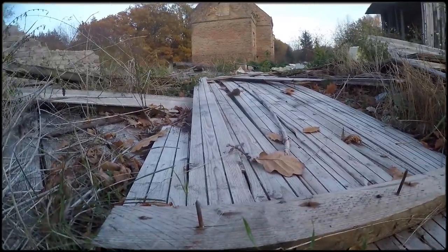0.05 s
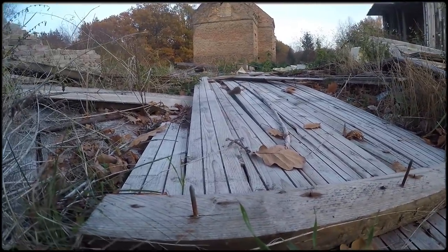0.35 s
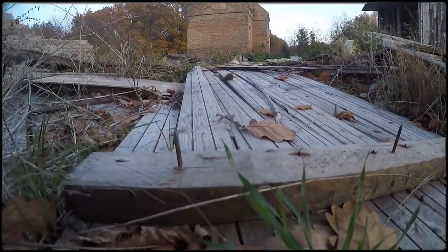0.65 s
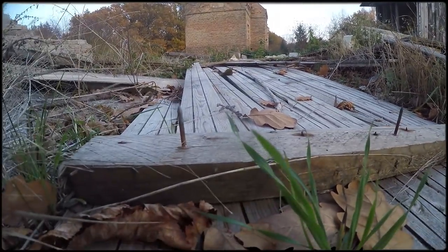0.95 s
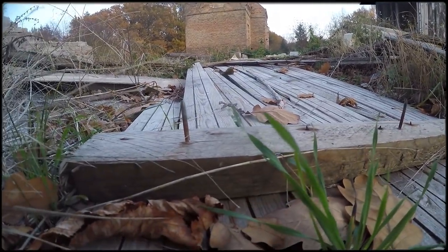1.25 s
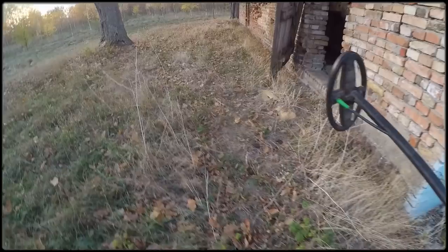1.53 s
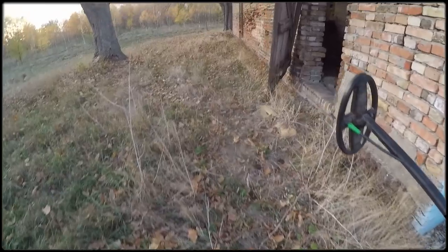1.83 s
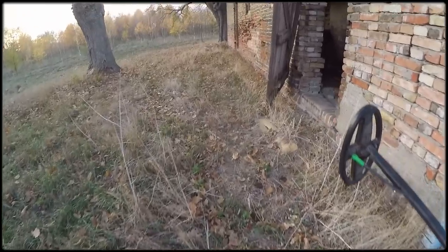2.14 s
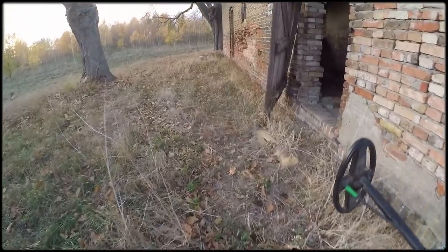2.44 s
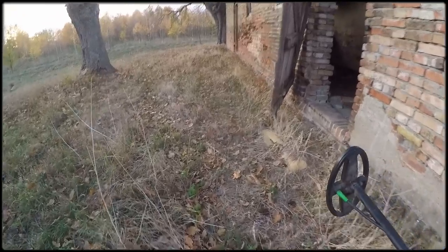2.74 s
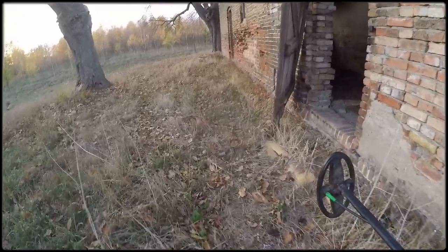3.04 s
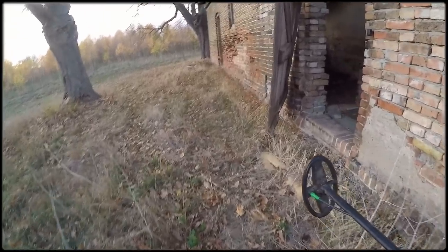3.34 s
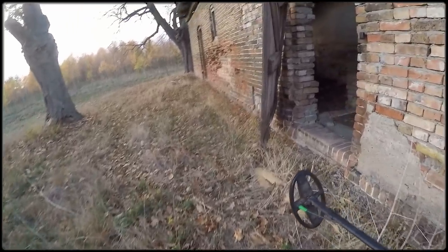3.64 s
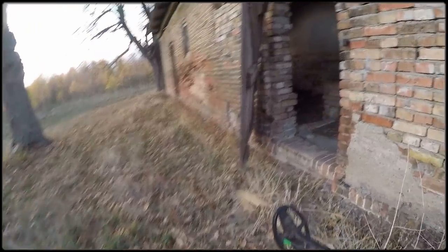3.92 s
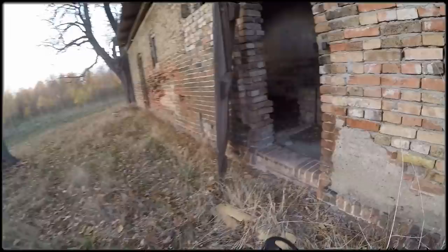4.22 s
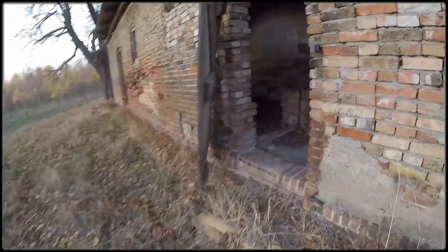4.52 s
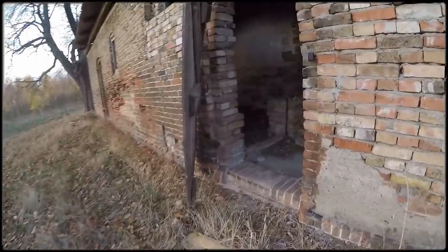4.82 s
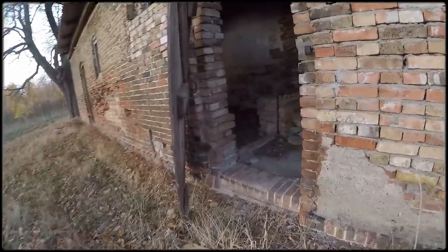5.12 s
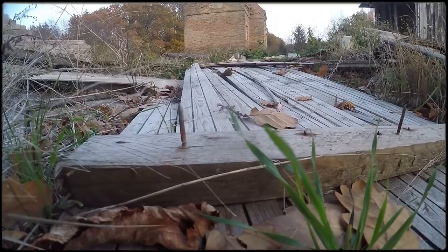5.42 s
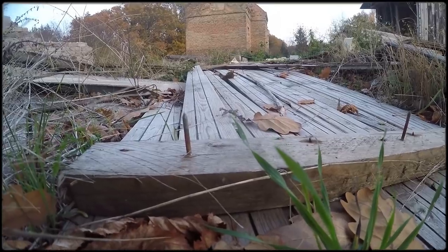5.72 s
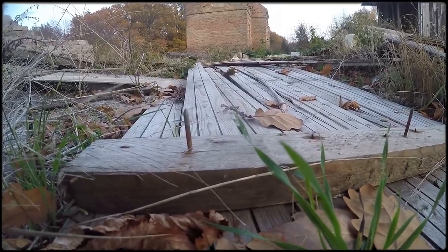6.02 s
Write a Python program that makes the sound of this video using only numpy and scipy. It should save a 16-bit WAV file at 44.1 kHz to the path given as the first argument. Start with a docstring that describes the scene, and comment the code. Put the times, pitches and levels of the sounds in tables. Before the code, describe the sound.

Loud, hollow steps on loose planks give way to rustling leaves and cracking twigs, with quiet brushing grass before and after.

```python
"""An overgrown yard with old planks. First, grass stalks brush and flick a camera's case near the ground.
At about 1.6 s a louder, duller walk takes over: heavy steps thud on hollow boards, then feet shuffle
and a loose board sways. From about 3.4 s legs sweep through dry leaves while twigs snap underfoot.
At about 5.4 s the quiet grass returns. A light wind rumbles from start to end."""
import sys
import numpy as np
from scipy import signal
from scipy.fft import rfft, irfft
from scipy.io import wavfile
from scipy.ndimage import uniform_filter1d

SR = 44100
rng = np.random.default_rng(int(sys.argv[2]) if len(sys.argv) > 2 else 0)


def store_wav(level_fs):
    """Save 16-bit WAV to argv[1]."""
    pcm = np.round(np.clip(np.atleast_2d(level_fs), -1, 1) * 32767)
    wavfile.write(sys.argv[1], SR, pcm.T.astype(np.int16))


N = 267422

# Levels in dB are relative: each function may add a gain. A decay_s is the time to fade by 60 dB.
# footfalls: start_s, board_name, ring_db, rattle_db, rattle_decay_s, crush_db, crush_decay_s
FOOTFALLS = [(1.587, "short", -26.5, -29.5, 0.18, -38.5, 0.15),
             (1.607, "short", -30.5, -26.5, 0.051, -33.5, 0.1),
             (1.7775, "short", -11, -12, 0.08, -24.5, 0.19), (1.815, "short", -18.5, -28, 0.14, -49, .06),
             (2.126, "loose", -47, -40, 0.32, -36.5, 0.23), (2.145, "short", -11, -25, 0.14, -39, .1),
             (2.159, "loose", -2, -6.5, 0.21, -11.5, 0.12), (2.192, "loose", -38, -16, 0.31, -30, 0.66),
             (2.224, "loose", -45, -22.5, 0.15, -16, 0.021), (2.246, "short", -45, -36, 0.25, -44, 0.08),
             (3.9975, "long", -8.5, -22.5, 0.6, -23, 0.19)]
# the tones of each of three boards, by name: pitch_hz, level_db, decay_s
BOARD_TONES = {"short": [(62, -39, 0.13), (125, -19, 0.0983), (181.6, -1, 0.11), (249, -5, 0.088),
               (378, -16.5, 0.075), (486, -5, 0.023), (669, -23, 0.3)], "loose": [(48.3, -33, 0.96),
               (80, -12.5, 0.54), (125.6, -29, 0.2), (331, -1, 0.054), (482, -3, 0.077), (660, -43, 0.1233),
               (841, 3.5, 0.0345), (1073, 14, 0.0068)], "long": [(45, -12, 0.17), (69, -0.5, 0.26),
               (266, -10, 0.19), (360, 7, 0.066), (406.3, -0.5, 0.23), (467, -8, 0.25), (820, -36, .07)]}
# knocks of shifting feet and rocking boards: start_s, level_db, pitch_hz
FOOT_KNOCKS = [(1.707, -31.5, 270), (1.783, -18, 206), (2.129, -15.5, 53.3), (2.168, -8, 61),
               (2.226, -11, 113), (2.246, -14.5, 59), (2.529, -29, 292), (2.546, -30.5, 85.5),
               (2.614, -24, 153), (2.673, -31, 127), (2.749, -24.5, 249), (2.817, -27, 390),
               (2.897, -34, 193), (2.943, -27.5, 143), (3.016, -31, 243), (3.064, -26.5, 204),
               (3.092, -22.5, 241), (3.162, -33.5, 445), (3.371, -27.5, 175), (3.851, -26.5, 220),
               (4.102, -23, 105), (4.154, -23, 78.5), (4.25, -26.5, 401), (5.384, -29, 77)]
# things that break: start_s, level_db, pitch_hz, decay_s, stem_db
TWIG_CRACKS = [(1.771, -31, 2200, .012, -5), (1.7745, -15.5, 2400, 0.027, -4),
               (1.817, -23.5, 1460, 0.099, -22), (2.159, -9, 3620, 0.023, -10.5),
               (2.8187, -33, 1460, 0.029, 2.5), (2.946, -33.5, 2390, 0.033, -19),
               (3.0255, -38, 1950, .025, -7), (3.044, -33, 1880, 0.005, 7), (3.3707, -29, 4500, 0.11, -28),
               (3.4974, -23.5, 2700, 0.0066, -1), (3.853, -21, 2980, 0.02, -1),
               (3.979, -16.5, 974, 0.083, -13.5), (3.989, -8.5, 3800, 0.0087, -16),
               (4.0732, -11.5, 3000, .028, -6), (4.088, -17.5, 3720, 0.13, -18.5),
               (4.2886, -24.5, 1240, 0.034, -12), (4.671, -12, 3880, 0.006, -3),
               (4.684, -28, 1480, 0.053, -15), (5.16, -22.5, 3220, 0.006, -17),
               (5.2485, -25.5, 3980, 0.037, -5.5), (5.3714, -17, 3320, 0.013, -31),
               (5.382, -14, 3720, 0.028, -31)]  # twigs and splinters underfoot
BLADE_SNAPS = [(.1495, -33, 6800, 0.028, -3), (.224, -26.5, 5860, 0.0036, -3),
               (.2995, -36.5, 7900, 0.024, -23), (.713, -41, 9900, 0.019, -12),
               (.9416, -25.5, 8200, 0.0066, -30), (1.0055, -41, 4800, 0.0049, 4),
               (1.083, -49, 4057, 0.042, -20), (1.273, -51, 1390, 0.05, -1), (1.532, -49.5, 1250, 0.055, 0),
               (5.888, -48, 6950, .008, .5)]  # dry grass blades nearby
# stalks flicking the case: start_s, catch_count, level_db, tick_db
STALK_FLICKS = [(.0036, 1, -29, 8), (0.0218, 1, -24, -2), (0.0343, 5, -26.5, -3), (0.0848, 1, -25.5, -2),
                (.102, 1, -27.5, -10), (0.1258, 1, -23.5, 7), (.1921, 2, -22.5, -4), (0.225, 1, -22.5, -7),
                (.249, 1, -24, 6), (.278, 1, -24, -15), (.303, 1, -23.5, -7), (.331, 1, -21, 5.5),
                (.354, 1, -22.5, 7.5), (0.3883, 1, -21, 8.5), (0.4373, 1, -24, 6), (.5162, 1, -21.5, 5.5),
                (.544, 1, -23, -10), (0.6037, 1, -24.5, 7.5), (0.7256, 1, -26.5, 10), (0.9657, 1, -26.5, 0)]
# the tones of the case: pitch_hz, level_db, decay_s
TOCK_TONES = [(113.3, -12, 0.034), (200, -4, 0.025), (1028, 11.5, 0.0078)]  # its hollow tock
TICK_TONES = [(2860, 1.5, 0.0028), (5600, -3, 0.0034), (7750, 0, 0.0027)]  # its high tick

# movements that swell and fade: peak_s, level_db, rise_s, hold_s, fall_s
LEG_SWEEPS = [(3.39, -34.5, 0.022, 0.01, 0.26), (3.66, -26, 0.31, 0.33, 0.43), (4.4, -45, 0.42, 0.06, 0.24),
              (4.67, -39, 0.045, 0.018, 0.072), (4.75, -45.5, 0.35, 0.35, 0.35),
              (5.12, -31.5, 0.21, .1, 0.31), (5.39, -29, 0.088, 0.041, 0.11)]  # legs sweeping dry leaves
SOLE_SCUFFS = [(1.86, -40, .1, 0.02, .2), (3.1, -31.5, 0.077, 0.012, 0.064), (4.3, -42, 0.6, 0.1, .3)]  # soles scuffing the boards
BOARD_SWAYS = [(2.57, 1.5, 0.044, 0.12, 0.45), (2.92, -2.5, 0.16, 0.55, .3)]  # the loose board swaying
GRASS_STIRS = [(0, -51, .1, 0.73, 0.51), (.55, -51.5, 0.28, 0.057, 0.057), (1.2, -57, .25, 0.044, 0.79),
               (5.44, -57, 0.28, 0.012, 1.35)]  # grass stirred by the camera, then settling

# colours, or how strong a noise is from low to high: frequency_hz, level_db
RATTLE_COLOUR = [(30, 1.5), (90, 11), (200, 5.5), (330, -7.5), (500, 1), (620, -4.5), (820, -2),
                 (1150, -22), (2000, -46.5), (5000, -53.5)]  # loose boards rattling after a step
CRUSH_COLOUR = [(300, -17.5), (1200, 0.5), (1750, -6.5), (2150, -2.5), (2450, 4), (3400, -0.5),
                (4300, -7.5), (5200, -16), (6200, -25)]  # leaves crushed by a step
LEAF_COLOUR = [(88, -32), (150, -1), (254, -15.5), (456, -2), (508, -7), (611, -3.5), (807, -6),
               (956, -5.5), (3340, -1.5), (4210, -4.5), (6000, -14), (7800, -50), (13200, -120)]  # swept leaves
HOLLOW_COLOUR = [(50, -24), (110, -4), (220, -0.5), (400, -6.5), (800, -10.5), (1500, -18.5), (4000, -46)]  # hollow boards
SWAYING_COLOUR = [(15, -12.5), (32, 2), (70, 0), (130, -1.5), (220, -12.5), (600, -58)]  # the swaying board
GRASS_COLOUR = [(180, -8), (300, 0), (620, -6.5), (1640, -9), (2520, -11.5), (3690, -11.5), (4720, -12.5),
                (8140, -12.5), (8700, -12.5), (14800, -25.5), (15500, -38.5)]  # brushing grass
WIND_COLOUR = [(12, 2), (30, 9), (60, -0.5), (120, -5), (200, -15), (400, -33), (1000, -47.5), (3000, -82)]  # wind
AIR_COLOUR = [(150, -56), (250, -4), (366, -21), (717, -12.5), (867, -18), (1510, -16), (3280, -44),
              (4960, -24), (15500, -25.5)]  # still air

WALK_START_S, WALK_END_S = 1.587, 5.424
WALK_CUTOFF_HZ, SPILL_CUTOFF_HZ, TOP_CUTOFF_HZ = 6200, 9600, 15700


def footsteps(heel_s=0.00055):
    """The heel makes a board ring, the pile rattles, and leaves are crushed under the sole."""
    t, out = np.arange(SR * 3 // 4) / SR, np.zeros(N)
    contact = 1 - np.exp(-t / heel_s)
    for start_s, board, ring_db, rattle_db, rattle_decay_s, crush_db, crush_decay_s in FOOTFALLS:
        thud = amp(ring_db) * ring(BOARD_TONES[board], t)
        rattle = amp(rattle_db) * noise(RATTLE_COLOUR, len(t)) * fade(t, rattle_decay_s)
        crush = amp(crush_db) * noise(CRUSH_COLOUR, len(t)) * fade(t, crush_decay_s)
        add(out, start_s, (thud + rattle + crush) * contact)
    return out


def leaves(sweeping, bands=7):
    """Dry leaves slide over legs: a crackly swish whose colour shifts from tuft to tuft."""
    ticks = crackle(per_s=1400, spread_db=-1.5, decay_s=0.0027, low_hz=690, high_hz=5700)
    spectrum = rfft(colour(rng.standard_normal(N) + amp(-6) * ticks, LEAF_COLOUR))
    hz, centres_hz = np.fft.rfftfreq(N, 1 / SR), np.geomspace(400, 5500, bands)
    swish = np.zeros(N)
    for share in np.eye(bands):  # each frequency band wavers on its own
        band = irfft(spectrum * np.interp(hz, centres_hz, share), N)
        swish += band * flutter(per_s=19, depth_db=1.85)
    return amp(0) * sweeping * unit(swish)


def breaks(rows, click_db, click_decay_s, splinter_db):
    """A twig or blade breaks: a sharp click, a spray of splinters, and the lower ring of the stem."""
    t, out = np.arange(SR // 12) / SR, np.zeros(N)
    for start_s, level_db, hz, decay_s, stem_db in rows:
        click = ring([(hz, click_db, click_decay_s)], t)
        band = signal.butter(1, [hz / 1.6, min(hz * 1.5, SR / 2 - 1)], "bandpass", fs=SR)
        hiss = unit(signal.lfilter(*band, rng.standard_normal(len(t))))
        splinters = amp(splinter_db) * hiss * fade(t, decay_s)
        stem = ring([(hz / 6, stem_db, decay_s), (hz / 2.9, stem_db + 2, decay_s)], t)
        add(out, start_s, amp(level_db) * (click + splinters + stem))
    return out


def small_breaks(movement, offset_db, spread_db, middle_hz, decay_s, stem_db, count):
    """Lists small breaks at random moments, louder where the movement is stronger."""
    rows = []
    for when, size, pitch in rng.random((count, 3)):
        level_db = 20 * np.log10(movement[int(when * N)] + 1e-9) + offset_db + spread_db * (size - .5)
        rows.append((when * N / SR, level_db, middle_hz * 2 ** (pitch - .5), decay_s, stem_db))
    return rows


def shuffle(rest_db=-44, stride_db=-10.5, sole_s=0.0016):
    """Weight shifts on the boards: soft knocks and a hollow rumble that grows with each stride."""
    t = np.arange(SR // 2) / SR
    strides = amp(stride_db) * swells(LEG_SWEEPS)
    weight = np.sqrt(amp(rest_db) ** 2 + swells(SOLE_SCUFFS) ** 2 + strides ** 2)
    out = amp(-3) * weight * noise(HOLLOW_COLOUR) * flutter(per_s=14, depth_db=5)
    contact = 1 - np.exp(-t / sole_s)
    for start_s, level_db, hz in FOOT_KNOCKS:
        decay_s = 0.088 * (200 / hz) ** 0.39  # higher knocks die sooner
        knock = ring([(hz, 0, decay_s), (hz * 1.485, -7, decay_s), (hz * 2.78, -11, decay_s / 2)], t)
        add(out, start_s, amp(level_db) * knock * contact)
    return out


def swaying_board():
    """The loose board sways with a deep rumble while weight shifts on it."""
    return amp(-37) * swells(BOARD_SWAYS) * noise(SWAYING_COLOUR) * flutter(per_s=14, depth_db=-1)


def overload(x, ceiling=.92, spill=.33):
    """The heaviest step overloads the microphone: its peaks flatten and spill some harsh treble."""
    flattened = np.clip(x, -ceiling, ceiling)
    return (1 - spill) * low_pass(flattened, WALK_CUTOFF_HZ) + spill * low_pass(flattened, SPILL_CUTOFF_HZ)


def stalk_flicks(push_s=0.00074, slip_s=.0088, detune=.027):
    """Each stalk pushes the case for a moment: a hollow tock, with a tick if the stalk is hard."""
    t, out = np.arange(SR // 20) / SR, np.zeros(N)
    contact = 1 - np.exp(-(t / push_s) ** 2)
    for start_s, catch_count, level_db, tick_db in STALK_FLICKS:
        for catch in range(catch_count):  # a dragged stalk slips and catches again
            detuned_t = t * (1 + detune * rng.standard_normal())
            flick = ring(TOCK_TONES, detuned_t) + amp(tick_db) * ring(TICK_TONES, detuned_t)
            add(out, start_s + catch * slip_s, amp(level_db) * contact * flick)
    # around 500 Hz, between its low and middle tones, the case hardly moves
    return signal.lfilter(*signal.iirnotch(500, Q=1.9, fs=SR), out)


def grass(brushing):
    """Blades brush close by: a fine hiss full of tiny ticks."""
    ticks = crackle(per_s=3300, spread_db=9.5, decay_s=0.0014, low_hz=1500, high_hz=14640)
    rustle = colour(rng.standard_normal(N) + amp(-3) * ticks, GRASS_COLOUR)
    return amp(4.5) * brushing * rustle * flutter(per_s=31, depth_db=.8)


def wind():
    """Wind on the microphone makes a lumpy, low rumble."""
    return amp(-43.5) * noise(WIND_COLOUR) * flutter(per_s=5.6, depth_db=2.7)


def still_air():
    """A faint, steady hush behind the grass."""
    return amp(-61) * noise(AIR_COLOUR)


def crackle(per_s, spread_db, decay_s, low_hz, high_hz, pitches=16):
    """Many tiny breaks of unequal size, each ringing briefly at its blade's pitch."""
    t, out = np.arange(SR // 100) / SR, np.zeros(N)
    for hz in np.geomspace(low_hz, high_hz, pitches):
        sizes = amp(spread_db * np.minimum(rng.exponential(1, N), 4))
        clicks = sizes * rng.choice([-1, 1], N) * (rng.random(N) < per_s / pitches / SR)
        out += np.sqrt(hz) * signal.oaconvolve(clicks, ring([(hz, 0, decay_s)], t))[:N]
    return unit(out)


def swells(rows):
    """Loudness over time: each movement grows 20 dB per rise_s, holds, then drops 20 dB per fall_s."""
    t, power = np.arange(N) / SR, np.zeros(N)
    for peak_s, level_db, rise_s, hold_s, fall_s in rows:
        before = np.maximum(peak_s - t, 0) / rise_s
        after = np.maximum(t - peak_s - hold_s, 0) / fall_s
        power += amp(level_db - 20 * (before + after)) ** 2
    return np.sqrt(power)


def flutter(per_s, depth_db):
    """A random gain that wanders up to about per_s times a second."""
    hz = np.fft.rfftfreq(N, 1 / SR)
    slow_noise = irfft(rfft(rng.standard_normal(N)) * np.exp(-(hz / per_s) ** 2), N)
    return amp(depth_db * unit(slow_noise))


def ring(tones, t):
    """A struck object rings as a sum of fading tones."""
    return sum(amp(db) * fade(t, decay_s) * np.sin(2 * np.pi * hz * t) for hz, db, decay_s in tones)


def fade(t, decay_s):
    """Dies away by 60 dB in decay_s seconds."""
    return np.exp(-np.log(1000) * t / decay_s)


def noise(points, length=N):
    """Random noise with the given colour."""
    return colour(rng.standard_normal(length), points)


def colour(x, points):
    """Shapes the lows and highs of x with a colour table, at an average level of 1."""
    points_hz, points_db = np.transpose(points)
    hz = np.fft.rfftfreq(len(x), 1 / SR)
    gain = amp(np.interp(np.log(hz + 1), np.log(points_hz), points_db))
    return unit(irfft(rfft(x) * gain, len(x)))


def low_pass(x, hz):
    """Cuts away the sound above hz."""
    return signal.oaconvolve(x, signal.firwin(511, hz, window=("kaiser", 9), fs=SR), "same")


def amp(db):
    """Turns decibels into a gain to multiply by."""
    return 10 ** (np.asarray(db) / 20)


def unit(x):
    """Scales x to an average (rms) level of 1."""
    return x / np.sqrt(np.mean(x ** 2) + 1e-20)


def add(mix, start_s, sound):
    """Mixes a sound in at start_s."""
    part = mix[max(round(start_s * SR), 0):][:len(sound)]
    part += sound[:len(part)]


def scene():
    """The dull, loud walk takes the place of the bright, quiet grass for a while."""
    t = np.arange(N) / SR
    walking = uniform_filter1d(((t > WALK_START_S) & (t < WALK_END_S)) * 1., size=44)  # 1 ms crossfades
    brushing = swells(GRASS_STIRS)
    sweeping = np.hypot(swells(LEG_SWEEPS), amp(-52))  # leaves still stir around the feet between sweeps
    small_snaps = small_breaks(brushing, offset_db=4, spread_db=10, middle_hz=5560,
                               decay_s=.012, stem_db=-15, count=50)
    small_cracks = small_breaks(sweeping, offset_db=-9, spread_db=4, middle_hz=3080,
                                decay_s=.01, stem_db=3, count=40)
    near = grass(brushing) + still_air() + stalk_flicks()
    near += breaks(BLADE_SNAPS + small_snaps, click_db=3, click_decay_s=0.0068, splinter_db=5)
    twigs = breaks(TWIG_CRACKS + small_cracks, click_db=7, click_decay_s=0.0051, splinter_db=-2)
    walk = footsteps() + shuffle() + swaying_board() + leaves(sweeping) + twigs
    dull_walk = overload(low_pass(walk, WALK_CUTOFF_HZ))
    return (walking * dull_walk + (1 - walking) * near + wind())[None]


def record(dry):
    """Cuts away the very highest treble."""
    return low_pass(dry[0], TOP_CUTOFF_HZ)[None]


dry = scene()
out = record(dry)
store_wav(out)
```